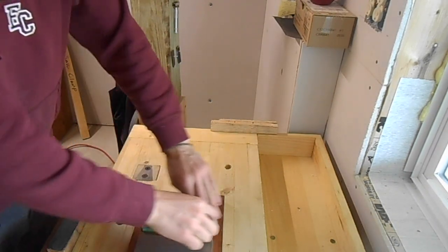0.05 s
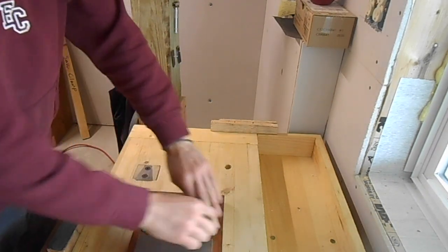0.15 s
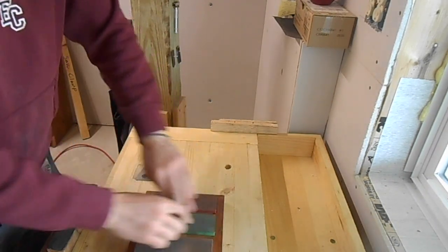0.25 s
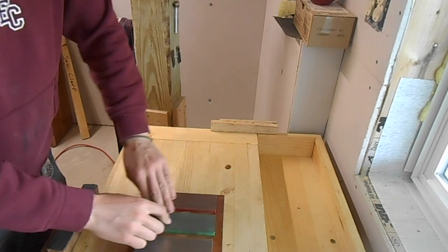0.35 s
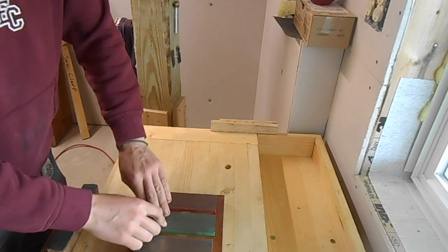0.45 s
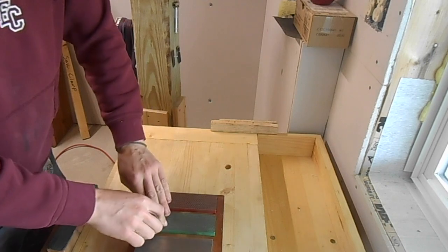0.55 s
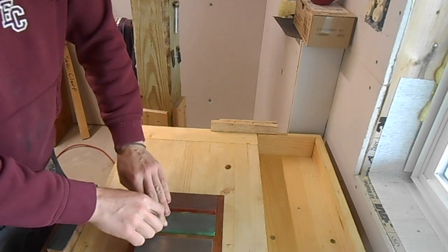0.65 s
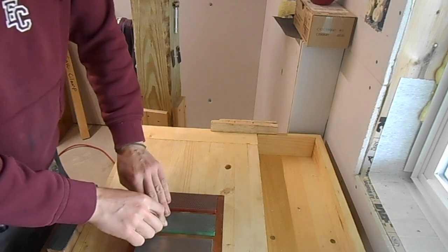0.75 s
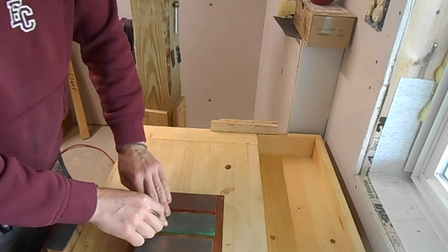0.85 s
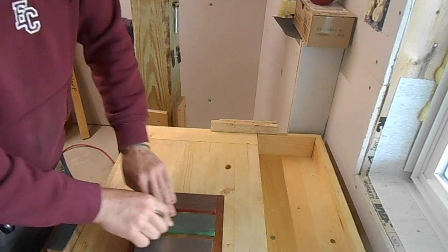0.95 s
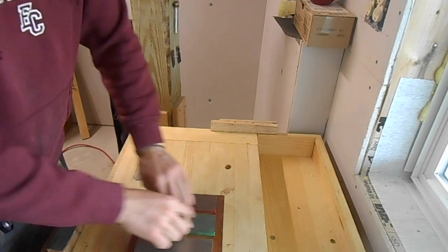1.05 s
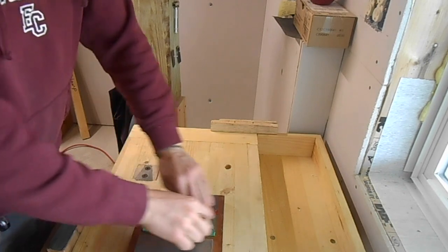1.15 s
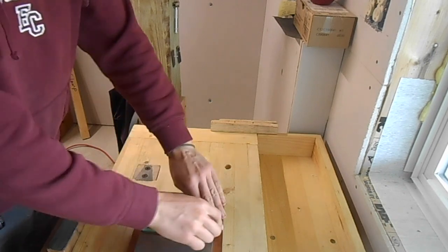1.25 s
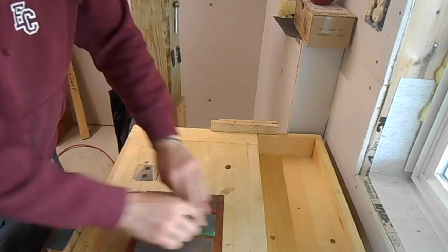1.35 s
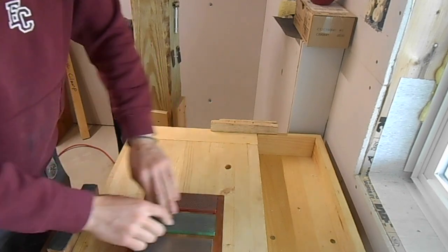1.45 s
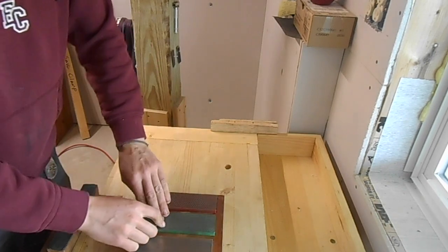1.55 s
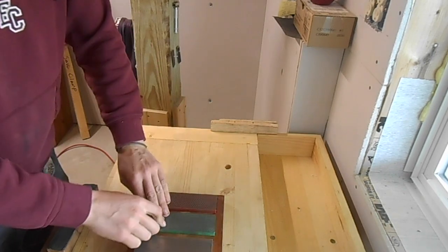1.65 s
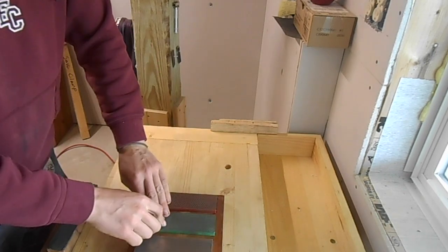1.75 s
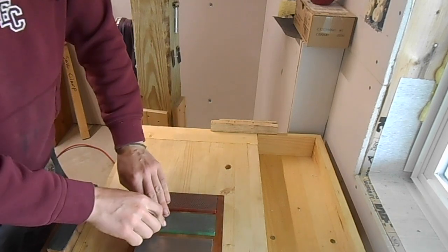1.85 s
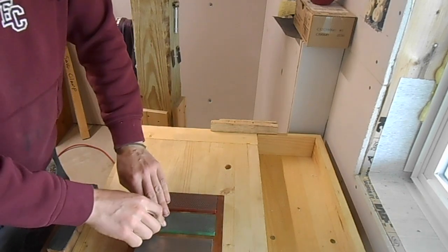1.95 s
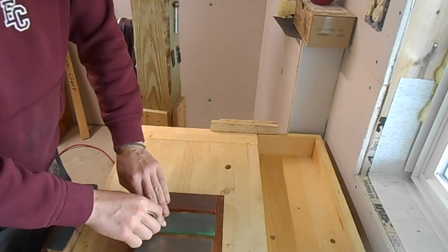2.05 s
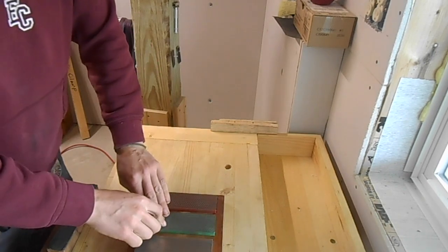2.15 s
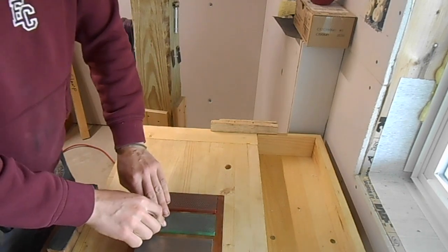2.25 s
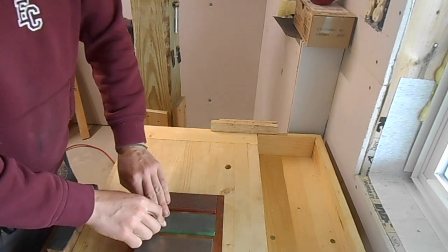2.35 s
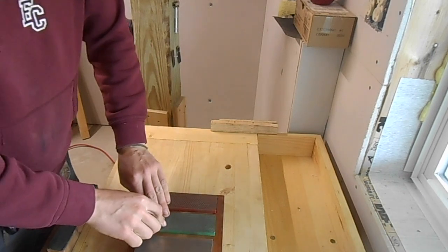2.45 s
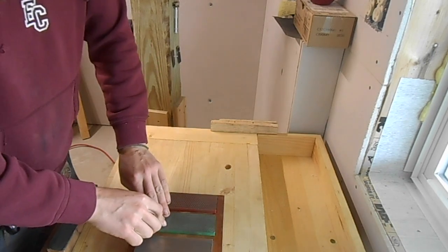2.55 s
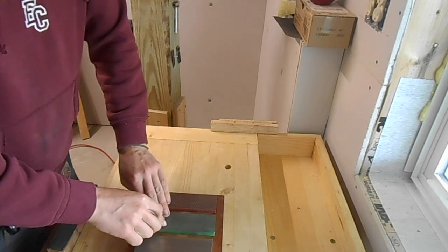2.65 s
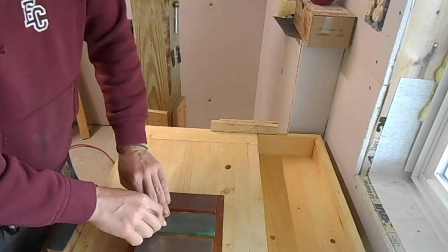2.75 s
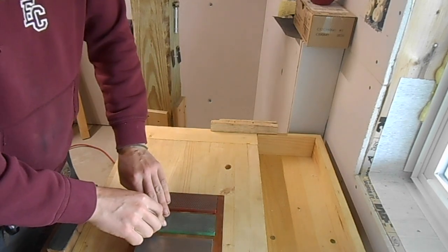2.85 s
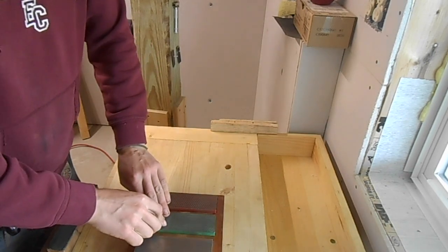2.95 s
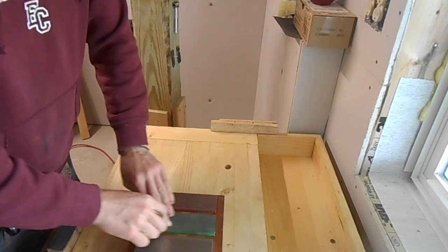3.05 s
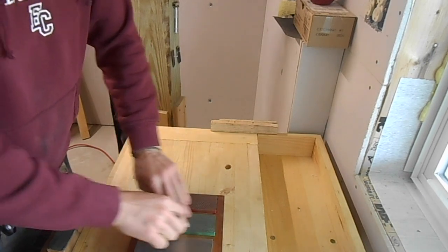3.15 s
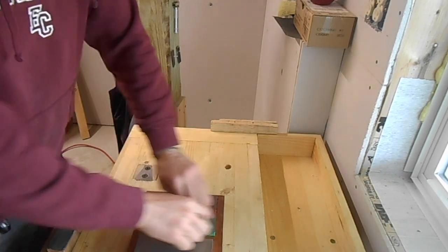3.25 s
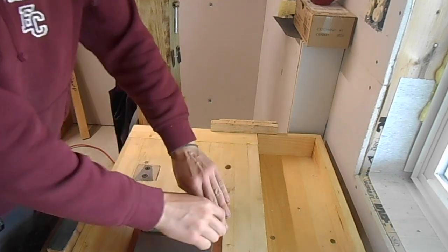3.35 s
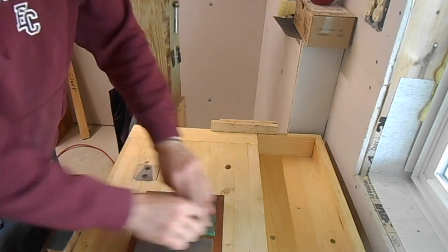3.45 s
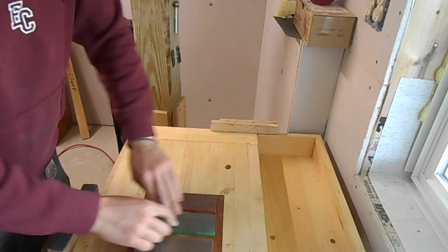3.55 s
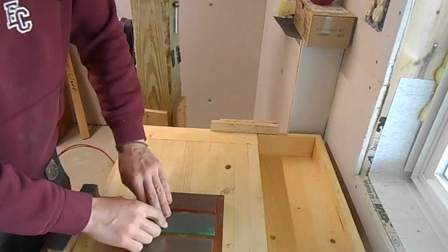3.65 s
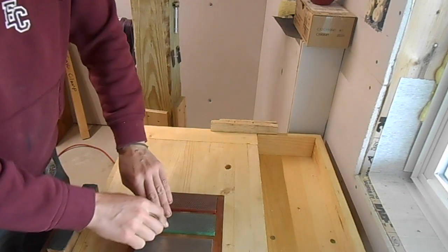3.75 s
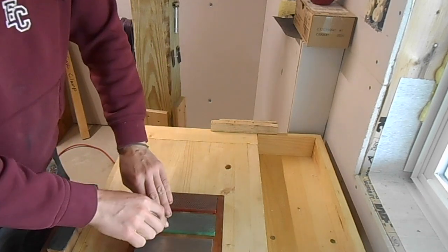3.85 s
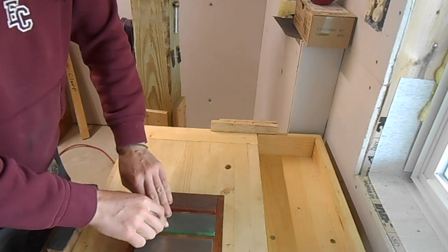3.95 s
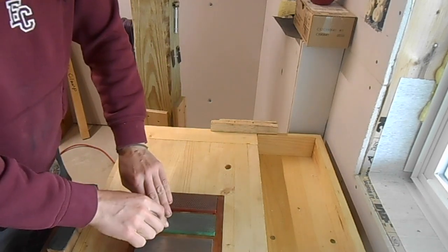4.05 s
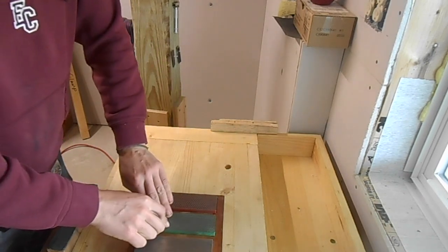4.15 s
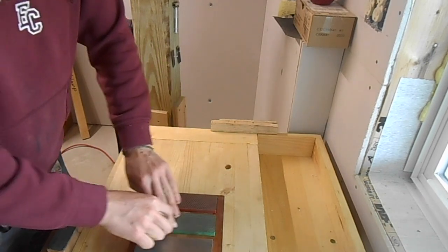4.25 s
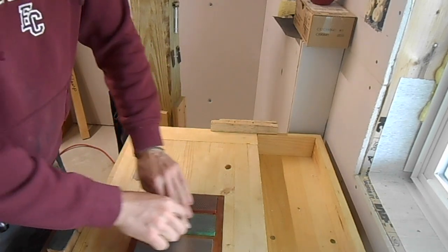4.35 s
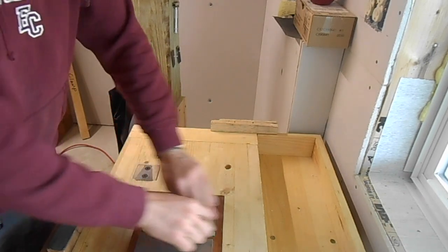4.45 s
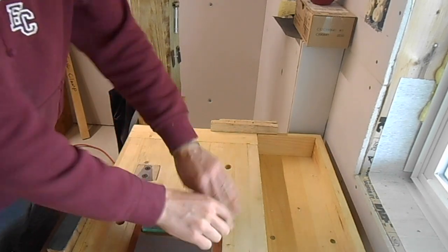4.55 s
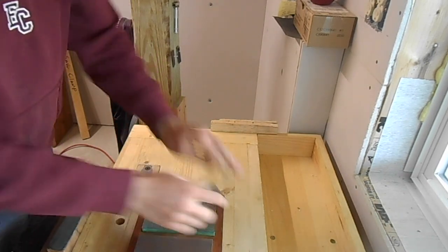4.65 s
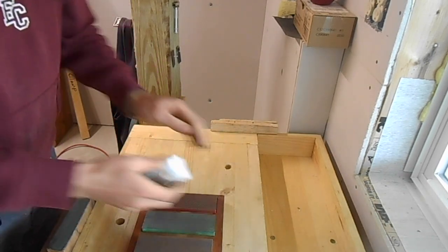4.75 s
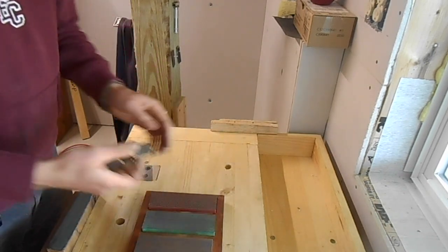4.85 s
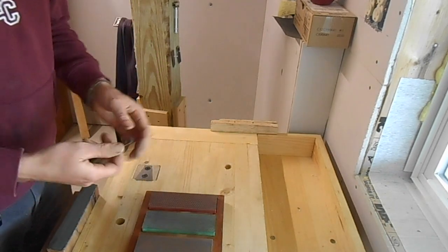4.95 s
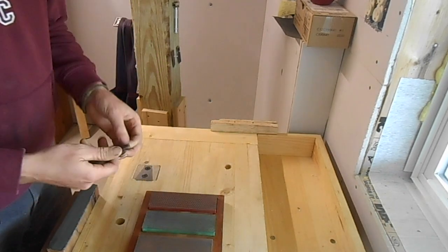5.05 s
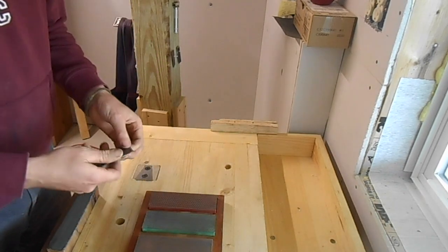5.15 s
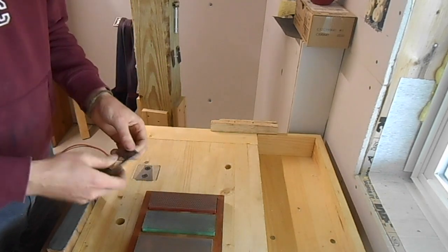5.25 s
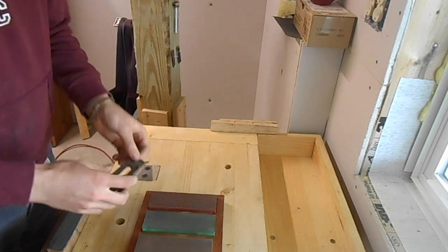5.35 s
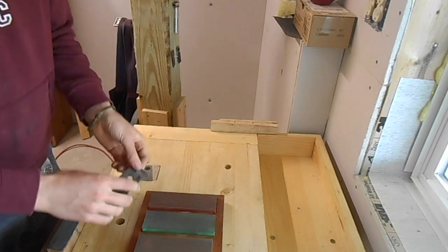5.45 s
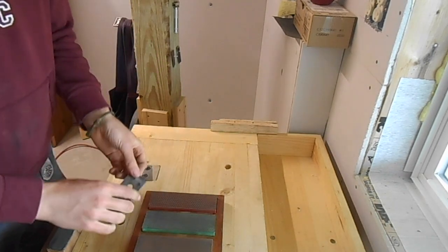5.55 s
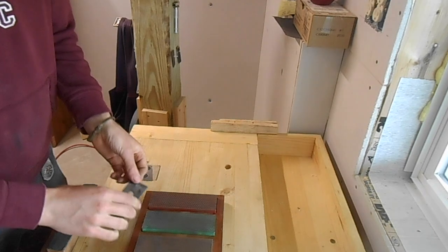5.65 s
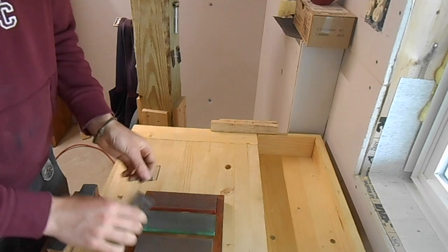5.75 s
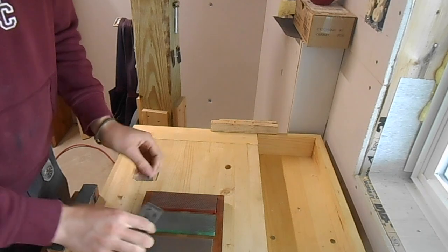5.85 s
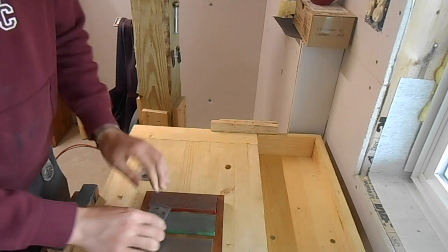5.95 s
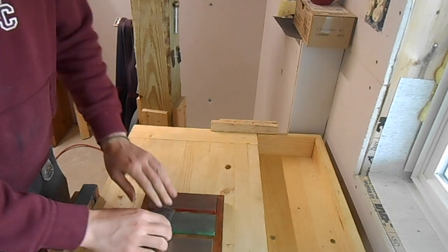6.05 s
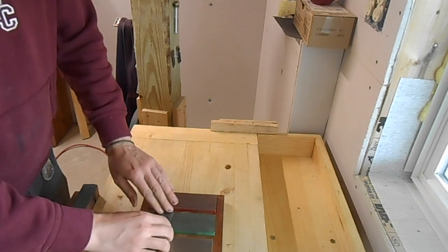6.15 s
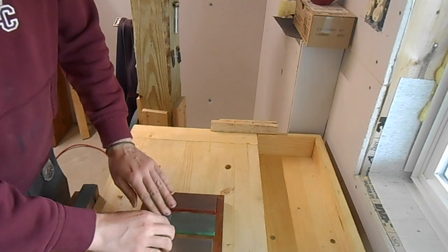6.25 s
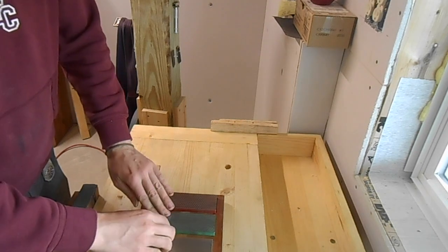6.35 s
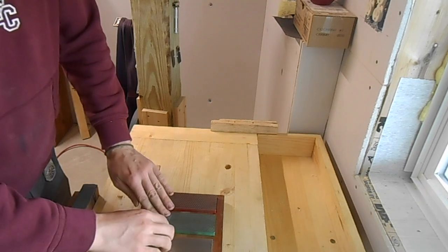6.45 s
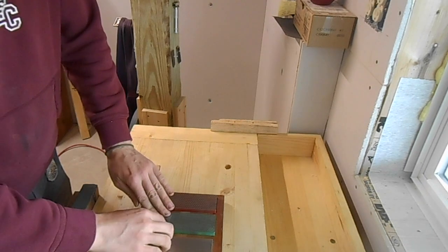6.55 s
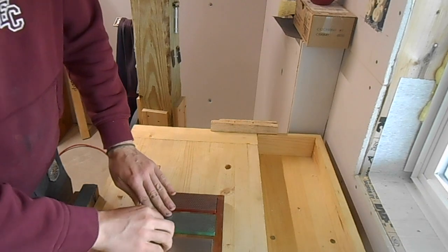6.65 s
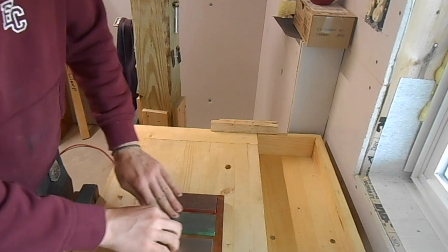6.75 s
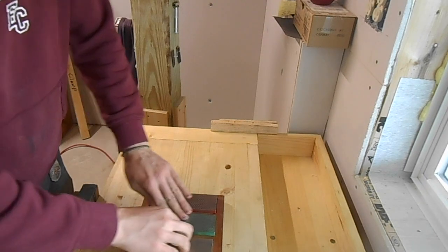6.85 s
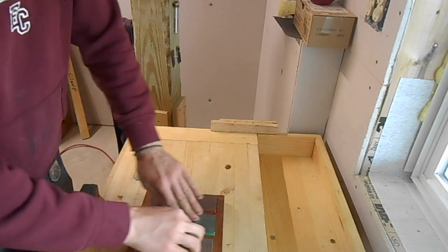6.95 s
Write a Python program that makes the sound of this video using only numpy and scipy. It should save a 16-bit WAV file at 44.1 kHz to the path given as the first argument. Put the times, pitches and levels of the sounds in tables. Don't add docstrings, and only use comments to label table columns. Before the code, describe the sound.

Close by a wooden bench in a small shop, a steel blade in a guide is pulled over coarse stone in separate bright, gritty rasps. Each pull ends in a dull tumble of knocks, followed by a sharp clack as the steel is set back. After the fourth, fingers rustle and scratch along the edge, a sleeve brushes past, and a much lighter stroke closes it over low bench hum and faint hiss.

```python
import sys
import numpy as np
from scipy import signal
from scipy.fft import rfft, irfft, next_fast_len
from scipy.io import wavfile
from scipy.ndimage import uniform_filter1d, map_coordinates

SR = 44100
rng = np.random.default_rng(int(sys.argv[2]) if len(sys.argv) > 2 else 0)


def gain_from_decibels(decibels):
    exponent = np.asarray(decibels, float) / 20
    return 10 ** exponent


def file_out(sig):
    cols = np.atleast_2d(sig).T
    lim = np.clip(cols, -1, 1)
    pcm = np.round(lim * 32767).astype(np.int16)
    wavfile.write(sys.argv[1], SR, pcm)


N = 308259
TIME = np.arange(N) / SR

# touch_s, lift_s, steel_hiss_db, gather_speed_s, hand_pressure_db
PULLS = [
    (-.2, .125, -31.5, 0.086, -0.5),
    (.95, 1.29, -38.5, 0.031, 2.5),
    (3.04, 3.4, -36, 0.064, 1.5),
    (4.2, 4.585, -36.5, 0.084, 2.5),
    (6.738, 6.81, -39, 0.0019, -11),
    (6.811, 7.1, -35, 0.011, -7.5),
]
# pitch_hz, width_hz, level_db
STEEL_PARTIALS = [(4800, 250, -9), (5700, 200, -5), (6250, 220, -5), (7200, 300, -5), (7800, 250, -4),
                  (8300, 200, -2), (8800, 250, 0), (9400, 300, -5)]
# pitch_hz, level_db (per Hz)
STEEL_HISS = [(2650, -27.5), (4500, -8.5), (6630, 6), (7010, 5.5), (8580, 7.5), (9220, 6), (10200, -3),
              (13300, -47), (22000, -120)]
BLADE_CLIMB = (0.204, .65)
# touch_hz, lift_hz
BLADE_RING = (3390, 3770)
# pitch_hz, width_hz, level_db
BENCH_RASP = [(283, 47, 1.5), (565, 230, -5), (790, 85, -3.5), (1115, 49, 1.5), (1920, 47, 5.5),
              (2300, 34, 6), (2700, 1600, -5.5)]
# start_s, peak_db, ring_hz, snap_db (above the peak)
GUIDE_KNOCKS = [(0.18, -20, 640, -19), (0.194, -15, 570, -8.5), (0.206, -12, 670, -7.5),
                (0.215, -20, 926, -11), (0.224, -14, 557, -18), (0.498, -16, 625, -1),
                (0.515, -13, 680, -8), (1.33, -13.5, 527, -10.5), (1.34, -9.5, 710, -8.5),
                (1.348, -16, 1140, -10.5), (1.612, -14, 650, -8), (1.631, -18, 684, -19),
                (3.311, -25, 300, -25), (3.407, -18, 603, -13), (3.43, -15, 584, -29),
                (3.44, -10.5, 520, -24), (3.448, -14.5, 974, -28), (3.457, -13.5, 563, -28),
                (3.713, -14.5, 620, -6), (3.733, -17, 978, 4.5), (4.602, -9, 640, -37),
                (4.613, -15.5, 764, -16), (4.624, -8.5, 791, -11.5), (4.641, -12.5, 540, -19),
                (5.216, -34, 750, -7), (6.333, -17, 659, -14), (6.346, -24.5, 540, -10),
                (6.4, -18, 583, -7.5), (6.416, -24.5, 1040, -18)]
# pitch_hz, level_db, t60_s
WOOD_MODES = [(304, -7, 0.066), (412.4, -4, 0.069), (465.6, -7.5, 0.19), (570, -3, 0.067),
              (683, -8.5, 0.19), (793, 0.5, 0.05), (994, 1, 0.063), (1109, 0, 0.067), (1200, -4, 0.12),
              (1692, -12, 0.085), (1800, -10, 0.037)]
# start_s, peak_db, brightness_db,
# rattle_t60_s
STONE_CLACKS = [(0.075, -17, -21, 0.035), (0.1225, -10, -30, 0.13), (0.4932, -14.5, 4.5, 0.061),
                (1.123, -18, -25, 0.067), (1.2293, -29, -13, 0.045), (1.3416, -17.5, -35.5, 0.011),
                (1.6112, -11.5, -2, 0.049), (3.2567, -29.5, -2, 0.12), (3.2807, -12, -31, 0.071),
                (3.4, -23, -9, 0.027), (3.442, -23, -35, 0.01), (3.712, -3, -13, 0.047),
                (3.734, -18, -22, .015), (4.5345, -19.5, -11.5, 0.052), (4.5894, -18.5, -15, 0.053),
                (4.626, -24, -35, 0.012), (4.9686, -25, -17, 0.042), (5.034, -28, -9, 0.048),
                (5.0512, -27.5, -17, 0.038), (5.1302, -28, -13, 0.031), (5.143, -36.5, -5, 0.05),
                (5.1644, -24, -13.5, 0.019), (6.3336, -29, -12.5, 0.047), (6.4, -21.5, -11.5, 0.1),
                (6.748, -41, -3, 0.024), (6.8435, -38, -10, 0.03)]
# pitch_hz, width_hz, level_db, t60_s
BLADE_CLANG = [(1877, 350, 5, 0.094), (2740, 510, 0, 0.13), (3560, 900, 1, 0.12), (5180, 530, -8, 0.25),
               (6930, 490, -6.5, 0.12), (8610, 440, 5, 0.11)]
# start_s, pitch_hz, level_db, t60_s
LOOSE_RINGS = [(6.334, 3900, -43, .3), (6.334, 1760, -36, .3), (6.401, 1720, -31, .17),
               (6.334, 7200, -32, .03), (6.399, 7300, -30, .03), (.1255, 2750, -14, .02),
               (.1255, 3800, -18, .025), (.076, 8000, -23, .03), (6.748, 7600, -29, .015)]
# touch_s, lift_s, rustle_db, gather_speed_s, scratch_db (above the rustle)
FINGER_WIPES = [
    (4.855, 4.904, -48.5, .008, -7),
    (4.915, 4.995, -45, 0.017, 0),
    (5.029, 5.044, -47.5, 0.0017, 15.5),
    (5.056, 5.107, -49.5, .004, 6),
    (5.105, 5.145, -49, .006, 14.5),
]
# touch_s, lift_s, level_db, gather_speed_s, fade_db_per_s
SLEEVE_SWISHES = [
    (3.88, 3.958, -63, .03, 102),
    (5.216, 5.222, -51, .002, 400),
    (5.217, 5.302, -58, .005, 35),
]
# pitch_hz, width_hz, level_db
FRAME_MODES = [(38.6, 37, 1.5), (60.2, 22, -3), (80.1, 19.6, 1), (133.2, 20, 1)]
# pitch_hz, level_db (per Hz)
SHOP_HISS = [(18, -47), (30, 1), (150, -9), (227, -8), (290, -6.5), (408, -1), (698, -2), (751, -2),
             (870, -8), (1170, -6), (1720, -4), (2040, 1.5), (2360, -12.5), (2540, -13), (10200, -20),
             (13300, -91), (22000, -120)]
# pitch_hz, width_hz, level_db
SHOP_HUMS = [(765.4, 47, 8.5), (1023, 470, 2), (2070, 51, -3), (2560, 115, 0), (3013, 97, -4.5),
             (5630, 270, -12.5), (7560, 240, -10.5), (8240, 300, -7.5), (9100, 210, -11)]
# time_s, level_db
SHOP_STIR = [(0, -44.5), (.8, -50.5), (1.9, -50.5), (3.0, -54), (3.6, -45), (4.15, -52.5), (4.8, -45),
             (5.25, -43), (5.8, -49.5), (6.2, -51.5), (6.5, -48), (6.99, -44)]
# pitch_hz, t60_s, level_db
SHOP_ROOM = [(108, 0.79, -5.5), (371, 0.55, -4.5), (940, 0.46, -5), (1900, 0.71, -12), (3760, 0.37, -8.5),
             (8200, 0.48, -15)]


def unit(x):
    return x / np.sqrt(np.mean(x ** 2))


def ring(x, hz, t60):
    pole = np.exp(2j * np.pi * min(hz, .45 * SR) / SR - np.log(1000) / (max(t60, .001) * SR))
    return signal.lfilter([1], [1, -pole], x).imag


def band(x, lo_hz, hi_hz):
    return signal.sosfilt(signal.butter(N=2, Wn=[lo_hz, hi_hz], btype="band", fs=SR, output="sos"), x)


def colour(x, points):
    hz, db = np.transpose(points)
    size = next_fast_len(len(x))
    bin_hz = np.arange(size // 2 + 1) * SR / size
    gain = gain_from_decibels(np.interp(np.log(bin_hz + 1), np.log(hz), db))
    return unit(irfft(rfft(x, size) * gain, size)[:len(x)])


def walk(rate):
    hold = int(SR / rate)
    steps = np.repeat(rng.standard_normal(N // hold + 1), hold)
    return 1.02 * uniform_filter1d(uniform_filter1d(steps, hold), hold)[:N]


def resonances(x, peaks, wander_db, rate):
    total = np.zeros(N)
    for k, (hz, width, db) in enumerate(peaks):
        strength = (-1) ** k * gain_from_decibels(db + wander_db * walk(rate)) * np.sqrt(width)
        total += strength * unit(ring(x, hz, 4.8 / width))
    return unit(total)


def grit(spread_db):
    size = np.minimum(rng.exponential(size=N), 5)
    return unit(rng.standard_normal(N) * gain_from_decibels(spread_db * size))


def gesture(touch, lift, db, gather, fade_db_s):
    start_db = -30.5
    out = np.zeros(N)
    span = slice(max(int(touch * SR), 0), int((lift + 60 / fade_db_s) * SR))
    t = TIME[span]
    rise_db = start_db * np.exp((touch - t) / max(gather, .001))
    out[span] = gain_from_decibels(db + rise_db - fade_db_s * np.maximum(t - lift, 0))
    return out


def progress(at_touch, at_lift):
    moments = np.ravel([row[:2] for row in PULLS])
    return np.interp(TIME, moments, np.tile([at_touch, at_lift], len(PULLS)))


def effort(share, build):
    build_db = 2.5
    pulls = sum(gain_from_decibels(share * press_db) * gesture(touch, lift, db, gather, fade_db_s=260)
                for touch, lift, db, gather, press_db in PULLS)
    return gain_from_decibels(build * build_db * progress(-0.73, 0.32)) * pulls


def patchy(x, wander_db):
    return x + sum((gain_from_decibels(wander_db * walk(13)) - 1) * band(x, lo_hz, 1.25 * lo_hz)
                   for lo_hz in (4200, 5250, 6560, 8200))


def strokes():
    drift = .25
    blade_db, bench_db = -3, 1
    grains = grit(spread_db=3.5) * gain_from_decibels(0.88 * walk(60) + 1.45 * walk(25))

    centre_hz = np.interp(progress(0, 1), BLADE_CLIMB, BLADE_RING) * (1 + .02 * walk(15))
    bend = np.cumsum(1 + drift * (centre_hz / centre_hz.mean() - 1) + .012 * walk(12))
    partials = resonances(grains, STEEL_PARTIALS, wander_db=5, rate=16)
    partials = map_coordinates(partials, [bend], mode="mirror")
    steel = unit(patchy(colour(grains, STEEL_HISS), 3) + gain_from_decibels(-6) * partials)

    note = sum(np.exp(-((centre_hz - hz) / 220) ** 2) * unit(ring(grains, hz, 0.022))
               for hz in range(3000, 4100, 200))
    blade = gain_from_decibels(-10.0) * unit(band(grains, 3030, 5750)) + gain_from_decibels(-8) * note
    blade = blade * gain_from_decibels(2.5 * walk(14))

    rasp = resonances(grains, BENCH_RASP, wander_db=4, rate=14)
    bench = gain_from_decibels(-7.5) * unit(band(grains, 420, 4570)) + gain_from_decibels(-10.5) * rasp
    bench = bench * gain_from_decibels(1.5 * walk(11))
    deep = signal.sosfilt(signal.butter(N=2, Wn=750, fs=SR, output="sos"), bench)
    wood = effort(0.93, 0.93) * (bench - deep) + effort(1, 8.7) * deep
    return effort(0, .3) * steel + gain_from_decibels(blade_db) * effort(0.5, 0.55) * blade + gain_from_decibels(bench_db) * wood


def contacts():
    rebound_s, rebound_db, detune = .008, -8, 0.21
    luck = np.tanh(rng.standard_normal((len(GUIDE_KNOCKS), 2)))
    again = [(s + rebound_s * (1 + 0.301 * a), db + rebound_db, hz * (1 + detune * b), snap_db)
             for (s, db, hz, snap_db), (a, b) in zip(GUIDE_KNOCKS, luck)]
    return list(GUIDE_KNOCKS) + again


def knocks():
    out = np.zeros(N + 8192)
    t = np.arange(8192) / SR
    mode_hz, mode_db, t60 = np.transpose(WOOD_MODES)[:, :, None]
    for s, db, hz, snap_db in contacts():
        swing = (1 - np.exp(-t / 0.0012)) * np.exp(-t / 0.0023) * np.sin(2 * np.pi * hz * t)
        noise = rng.standard_normal(8192)
        snap = band(band(noise * np.exp(-t / 0.0056), 1130, 3420), 1000, 3600)
        strength, detune = rng.standard_normal((2, len(WOOD_MODES), 1))
        decay = 1.5 * np.tanh(strength) * gain_from_decibels(mode_db - 60 * t / t60)
        wood = np.sum(decay * np.sin(2 * np.pi * mode_hz * (1 + 0.024 * detune) * t), axis=0)
        i = int((s + .001) * SR)
        push = gain_from_decibels(5.5) * swing + gain_from_decibels(min(snap_db, -2) + 10) * snap + gain_from_decibels(-13) * wood
        out[i:i + 8192] += gain_from_decibels(db) * push
    return band(out[:N], 190, 4500)


def clacks():
    low, high = np.zeros((2, N + 8192))
    blows = np.zeros((len(BLADE_CLANG), N))
    t = np.arange(8192) / SR
    for s, db, bright_db, t60 in STONE_CLACKS:
        noise = np.clip(rng.standard_normal(8192), -2, 2)
        rattle = gain_from_decibels(db - 60 * t / max(t60, .005)) * noise
        i = int(s * SR)
        low[i:i + 8192] += rattle
        high[i:i + 8192] += rattle * gain_from_decibels(bright_db + 9)
        grip_db = 1.5 * rng.standard_normal(len(BLADE_CLANG))
        blows[:, i] += gain_from_decibels(db + 0.65 * bright_db + grip_db)
    buzz = rng.standard_normal(N)
    clang = np.zeros(N)
    for (hz, width, db, t60), blow in zip(BLADE_CLANG, blows):
        decay = signal.lfilter([1], [1, -gain_from_decibels(-60 / (t60 * SR))], blow)
        clang += gain_from_decibels(db) * decay * unit(ring(buzz, hz, 9.2 / width))
    rattles = gain_from_decibels(-8.0) * band(low, 1000, 4740) + gain_from_decibels(-2.5) * band(high, 3260, 8800)
    return rattles[:N] + gain_from_decibels(-16.0) * clang


def rings():
    out = np.zeros(N)
    t = np.arange(8192) / SR
    for s, hz, db, t60 in LOOSE_RINGS:
        i = int(s * SR)
        out[i:i + 8192] += gain_from_decibels(db - 60 * t / t60) * np.sin(2 * np.pi * hz * t)
    return out


def wipe():
    grains = grit(spread_db=5.5) * gain_from_decibels(3 * walk(120))
    rustle = unit(band(grains, 2800, 11000))
    scratch = unit(band(band(grains, 5450, 7400), 5350, 8200))
    sleeve = unit(band(rng.standard_normal(N), 3500, 4600))
    skin = sum(gesture(*row, fade_db_s=505) * (gain_from_decibels(3.0) * rustle + gain_from_decibels(bright_db - 3.5) * scratch)
               for *row, bright_db in FINGER_WIPES)
    return skin + sleeve * sum(gesture(*row) for row in SLEEVE_SWISHES)


def rumble():
    frame_t60_s, frame_db = 0.54, -7.5
    thump_db, thump_slope = -23, 1.58
    frame = band(resonances(rng.standard_normal(N), FRAME_MODES, wander_db=4.5, rate=6.4), 13, 210)
    keep = gain_from_decibels(-120 / (frame_t60_s * SR))
    feed = (1 - keep) * (gain_from_decibels(frame_db) * effort(1.6, .1)) ** 2
    for s, db, *_ in GUIDE_KNOCKS:
        feed[int(s * SR)] += gain_from_decibels(thump_slope * db + thump_db) ** 2
    energy = uniform_filter1d(signal.lfilter([1], [1, -keep], feed), size=900)
    return unit(frame) * np.sqrt(np.abs(energy))


def shop():
    s, db = np.transpose(SHOP_STIR)
    stir_db = db + 52
    treble_db, bass_db = .5 + 0.13 * stir_db, 4 - .2 * stir_db
    tones = resonances(rng.standard_normal(N), SHOP_HUMS, wander_db=1.2, rate=12)
    hiss = colour(rng.standard_normal(N), SHOP_HISS) + gain_from_decibels(-2.5) * tones
    treble = (gain_from_decibels(np.interp(TIME, s, treble_db)) - 1) * band(hiss, 3000, 11000)
    bass = (gain_from_decibels(np.interp(TIME, s, bass_db)) - 1) * band(hiss, 23, 250)
    hiss = band(hiss, 25, 15000) + treble + bass
    return unit(hiss) * gain_from_decibels(np.interp(TIME, s, db) + .6 * walk(9))


def room(x):
    t = np.arange(SR) / SR
    onset = np.clip(t / 0.0041 - .5, 0, 1)
    tail = np.zeros(SR)
    for hz, t60, db in SHOP_ROOM:
        decay = band(rng.standard_normal(SR), hz * 0.67, hz * 1.52) * gain_from_decibels(-60 * t / t60) * onset
        band_share = min(hz * 0.39 / (SR / 2), 1)
        tail += gain_from_decibels(db) * decay / np.sqrt(np.sum(decay ** 2) / band_share)
    return x + signal.fftconvolve(x, tail)[:N]


def scene():
    rubbed = strokes() + wipe()
    near = room(gain_from_decibels(1) * rubbed + knocks() + clacks() + rings())
    return (near + 0.12 * rubbed + rumble() + shop())[None]


def low_pass(x):
    return signal.sosfilt(signal.butter(12, 10370, fs=SR, output="sos"), x)


def record(dry):
    rounded = .56 * np.tanh(dry / .56)
    top_cut = signal.ellip(8, .5, 60, 10180, fs=SR, output="sos")
    return low_pass(signal.sosfilt(top_cut, rounded))


dry = scene()
out = record(dry)
file_out(out)
```